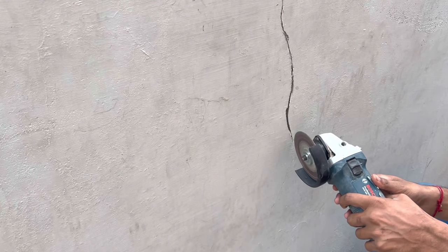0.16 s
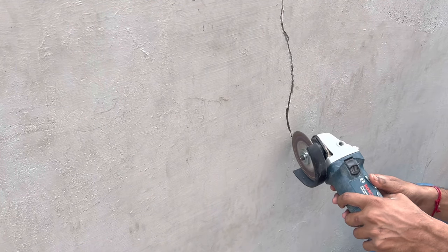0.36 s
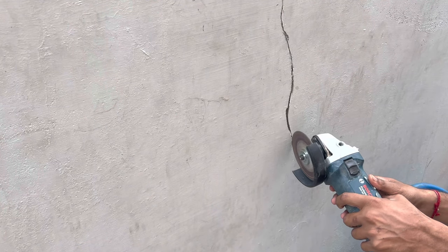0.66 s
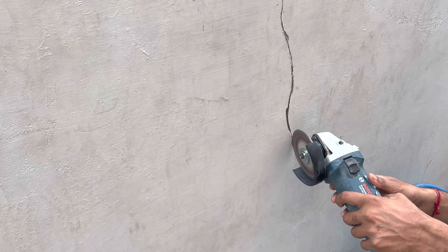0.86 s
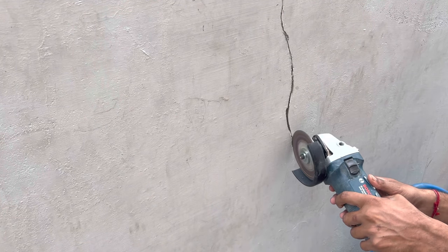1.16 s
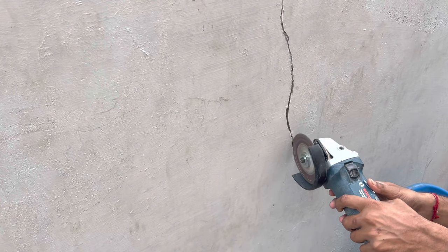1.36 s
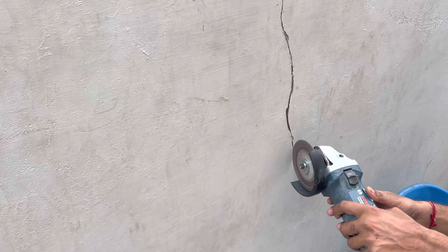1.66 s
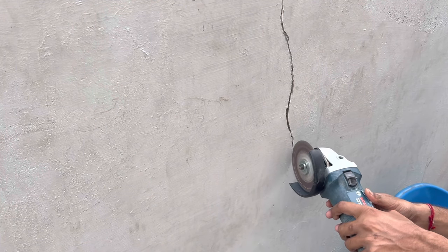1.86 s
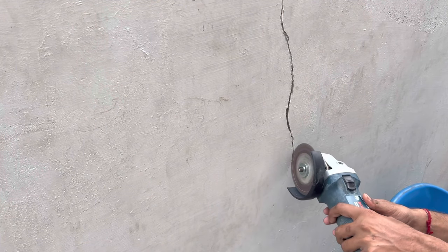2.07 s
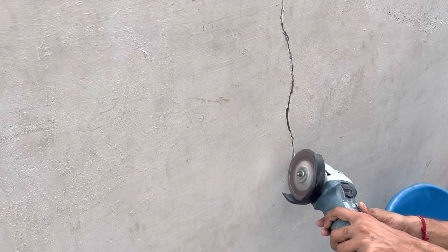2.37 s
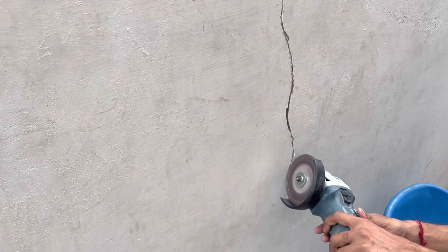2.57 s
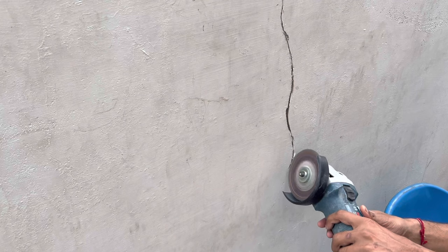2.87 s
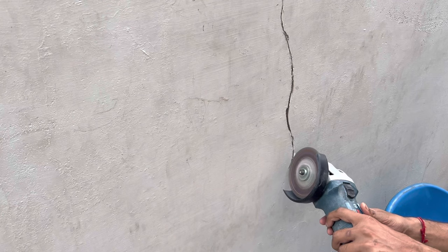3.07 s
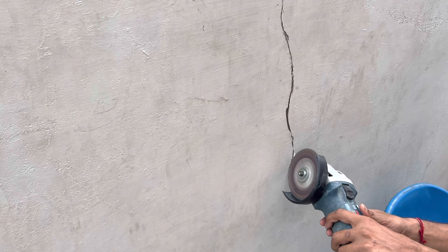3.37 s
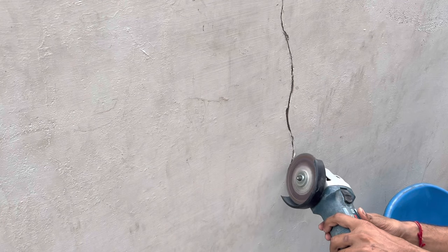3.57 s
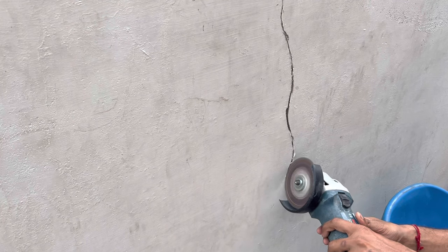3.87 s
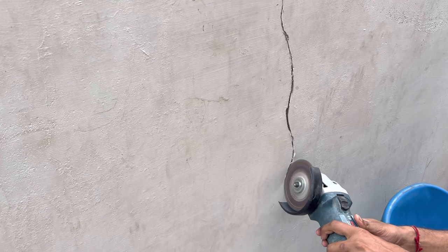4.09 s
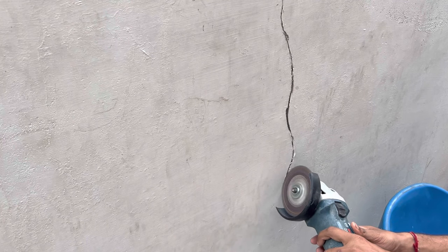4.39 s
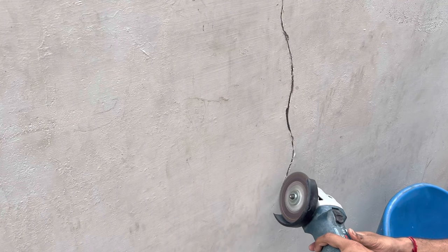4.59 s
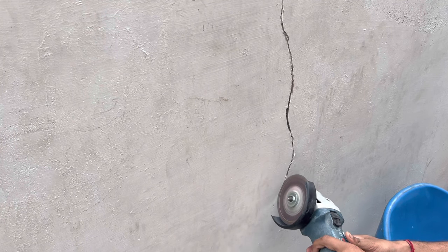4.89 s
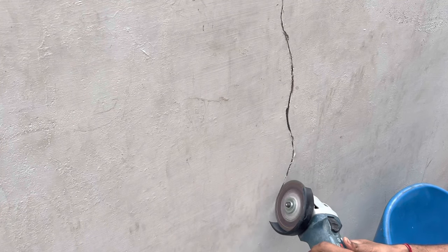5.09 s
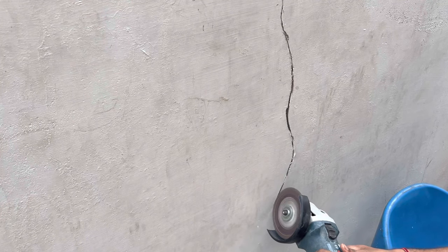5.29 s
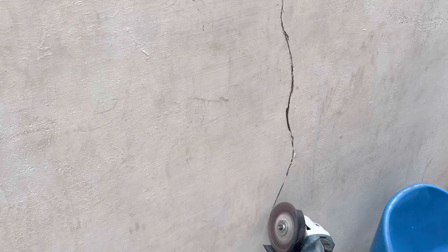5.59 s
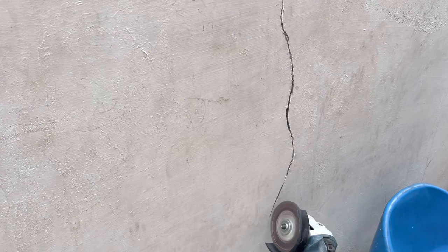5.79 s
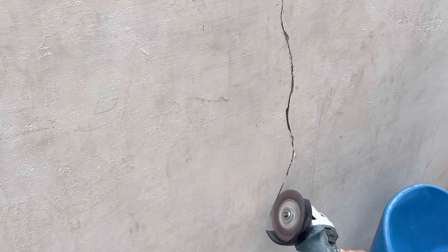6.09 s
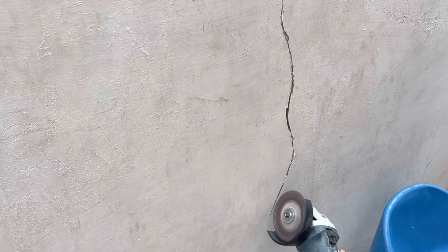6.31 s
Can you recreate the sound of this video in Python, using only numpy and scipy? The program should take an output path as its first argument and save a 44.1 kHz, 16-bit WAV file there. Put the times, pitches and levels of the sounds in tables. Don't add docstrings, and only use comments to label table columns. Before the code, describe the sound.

Electric grinder motor whirring with airy fan hiss, while a metal disc scrapes gritty masonry in bright, squealing bursts, with faint low knocks behind.

```python
import sys
import numpy as np
from scipy import signal
from scipy.fft import rfft, irfft, dct, next_fast_len
from scipy.io import wavfile
from scipy.ndimage import uniform_filter1d, map_coordinates

SR = 44100
rng = np.random.default_rng(int(sys.argv[2]) if len(sys.argv) > 2 else 0)


def undo_db(level):
    steps = np.asarray(level, float) / 20
    return 10 ** steps


def store_pcm(level_fs):
    pcm = np.round(np.clip(level_fs, -1, 1) * 32767).astype(np.int16)
    wavfile.write(sys.argv[1], SR, np.atleast_2d(pcm).T)


N = 284435
T = np.arange(N) / SR
SIZE = next_fast_len(N + 8192)
HZ = np.fft.rfftfreq(SIZE, 1 / SR)
GEAR = 9 / 32


def unit(x):
    return x / np.sqrt(np.mean(np.abs(x) ** 2) + 1e-20)


def curves(rows):
    s, *cols = np.transpose(rows)
    return [np.interp(T, s, c) for c in cols]


def wobble(rate_hz):
    knots = rng.standard_normal(int(N * rate_hz / SR) + 4)
    return map_coordinates(knots, [T * rate_hz])


def coloured(x, points):
    f, db = np.transpose(points)
    gain = undo_db(np.interp(np.log(HZ + 1), np.log(f), db))
    return irfft(rfft(x, SIZE) * gain, SIZE)[:N]


def fan_air():
    # frequency in Hz, level in dB per Hz.
    fan_spectrum = [(25, -46), (42, -24), (60, -13.5), (95, -24), (260, -20), (400, -13.5), (600, -11.5),
                    (1200, -5.5), (2500, 0), (4200, 1), (7500, -0.5), (9300, -6), (11900, 0.5),
                    (14000, -5.5), (15200, -14.5)]
    # frequency in Hz, width in Hz, level in dB.
    housing = [(829, 11, 3), (1253, 100, -4.5), (2240, 100, 0), (2616, 200, -6), (7030, 51, 2),
               (8000, 140, 7.5)]
    z = signal.stft(rng.standard_normal(N + 512), nperseg=512)[2]
    field = rng.standard_normal(z.shape)
    field = uniform_filter1d(uniform_filter1d(field, 6, 0), 12, 1)
    patchy = signal.istft(z * undo_db(1.2 * unit(field)), nperseg=512)[1][:N]
    air = coloured(patchy, fan_spectrum)
    peaks = 1 + sum(undo_db(db) / (1 + (2 * (HZ - hz) / width) ** 2) / 2 for hz, width, db in housing)
    return unit(irfft(rfft(air, SIZE) * peaks, SIZE)[:N])


def motor(turns, load):
    # cycles per disc turn, level in dB.
    disc_orders = [(2, -15.5), (3, -16), (4, -30), (5, -12.5), (8, -5.5), (24, 7)]
    # cycles per rotor turn, level in dB.
    rotor_orders = [(10, -64), (12, -64.5), (14, -64)]
    recede_db_per_s = -0.18
    strain_db = 0.9 * uniform_filter1d(load, size=8001)
    whine_db = -69 + 1.73 * recede_db_per_s * T + strain_db + (1.4 + 0.12 * T) * wobble(8.3)
    fan_db = -55 + recede_db_per_s * T + strain_db + 0.44 * wobble(7)

    def tone(cycles, db, blur_rad):
        level = undo_db(db + 0.7 * wobble(9.6) + 1.5 * wobble(0.8))
        return level * np.sin(2 * np.pi * cycles + blur_rad * wobble(40))

    blades = sum(tone(k * turns, db, 0.089 * k) for k, db in rotor_orders)
    tones = np.sin(2 * np.pi * turns + 0.21 * wobble(40))
    tones += sum(tone(k * GEAR * turns, db, 0.011 * k) for k, db in disc_orders)
    tones += (0.29 + load) * tone(GEAR * turns, -19.5, 0.1)
    return np.sqrt(2) * undo_db(whine_db) * tones + blades + undo_db(fan_db + 9.0) * fan_air()


def contact():
    # time in s, rim pressure in dB, lean in dB that feeds the middle modes.
    hands = [(0, -54.5, 2.5), (.44, -54, 0.5), (.5, -41, -1), (.72, -46.5, 3), (1.06, -38, 5.5),
             (1.3, -44, 2), (1.56, -44.5, -0.5), (1.9, -37.5, 3.5), (2.24, -40, -2), (2.31, -49, -3),
             (2.65, -56, 2.5), (3.3, -55, 1.5), (3.46, -43, 0.5), (4.0, -37.5, 0.5), (4.4, -44, -2),
             (4.8, -40, -2.5), (5.49, -43.5, -5), (5.55, -54, -4)]
    # time in s, half length in s, level in dB, extra squeal in dB.
    bites = [(0.054, 0.034, 1, 10), (0.377, 0.052, 6.5, 10.5), (0.613, 0.047, 3.5, 0), (0.677, .03, -4, -8),
             (0.801, 0.017, 2.5, 14.5), (1.195, 0.024, 0, -1), (1.274, .04, 2, -10), (1.6, 0.14, 1, -6),
             (1.746, .05, 2, -8), (1.936, 0.021, 1.5, 5), (2.035, .03, -0.5, 3), (2.146, 0.024, 0.5, 5),
             (2.207, 0.017, -1.5, 4), (2.241, 0.016, 3.5, -5), (2.726, 0.017, 4.5, 0),
             (3.233, 0.038, 6, 10), (3.349, .014, 7.5, 10), (3.633, 0.052, 1.5, 9), (3.832, 0.096, 0, 10),
             (4.0, 0.043, -0.5, 8.5), (4.08, .03, -3, 1), (4.345, 0.078, 0.5, -6), (4.778, .04, 0, 7),
             (4.84, 0.044, -2, -12), (5.14, .04, 2, 3), (5.33, .06, -4, 5), (5.428, 0.025, -0.5, 9.5),
             (5.6, 0.017, 9, 0), (6.195, .06, 4.5, -5), (6.32, 0.032, 11.5, 12.5)]
    # level in dB at firm pressure, growth in dB per dB of pressure, share of the lean.
    families = [
        (-41, 0.8, -0.23),
        (-41, 0.83, 0.77),
        (-43, 1.22, -0.19),
        (-49, 1.2, -0.026),
    ]
    firm_db = -42
    pressure_db, lean_db = curves(hands)
    shapes = [np.exp(-((T - s) / half_s) ** 2) for s, half_s, _, _ in bites]
    bite_db, extra_db = np.transpose(bites)[2:] @ shapes
    press_db = pressure_db + bite_db - firm_db
    drives = [db + grows * press_db + share * lean_db + 0.69 * wobble(19) for db, grows, share in families]
    drives[-1] = drives[-1] + extra_db
    return drives


def ring(force, modes, own_db, drift, favoured_hz=None, favour_db=0):
    # time in s, half length in s, mode in Hz, level in dB.
    flares = [(.5, 0.037, 3830, 6), (.8, 0.34, 8475, 4.5), (.9, .2, 10600, -2), (1.15, 0.24, 7300, 2),
              (1.61, .18, 5930, 8), (1.7, 0.4, 8475, 4.5), (1.585, 0.12, 4930, 6), (2.2, .1, 4625, 2.5),
              (2.35, .08, 4930, 6), (3.63, 0.043, 6418, 9), (3.795, 0.25, 4625, -4), (3.81, .03, 6418, 8),
              (3.854, 0.089, 7300, -5), (3.99, 0.035, 5930, 3), (4.05, .4, 8475, -4), (4.263, .07, 7300, 7),
              (4.36, .1, 5930, 7.5), (4.62, .07, 3850, 2.5), (4.801, 0.26, 5930, 3), (4.85, .2, 4625, 0.5),
              (5.465, 0.059, 10600, 9), (5.65, .15, 4680, 4), (6.194, 0.038, 4930, 4.5),
              (6.31, .04, 4700, -3), (6.322, 0.035, 3870, 6), (6.321, 0.026, 11310, 9.5)]
    out = np.zeros(N)
    for hz, width_hz, db in modes:
        pole = np.exp(-np.pi * width_hz / SR)
        luck_db = own_db * np.clip(wobble(13), -2, 2)
        if favour_db:
            luck_db += favour_db * np.exp(-(np.log(hz / favoured_hz) / 0.075) ** 2)
        for s, half_s, flare_hz, flare_db in flares:
            off_pitch = (np.log(hz / flare_hz) / 0.018) ** 4
            off_time = np.abs((T - s) / half_s) ** 3
            luck_db += flare_db * np.exp(-off_pitch - off_time)
        noise = rng.standard_normal(N) + 1j * rng.standard_normal(N)
        shake = force * undo_db(luck_db) * noise
        swing = np.sqrt(1 - pole ** 2) * signal.lfilter([1], [1, -pole], shake)
        cycles = np.cumsum(hz * (1 + drift * wobble(5))) / SR
        out += undo_db(db) * np.real(swing * np.exp(2j * np.pi * cycles))
    return out / np.sqrt(sum(undo_db(db) ** 2 for _, _, db in modes))


def disc(turns, drives):
    # frequency in Hz, width in Hz, level in dB.
    low_modes = [(3540, 75, -5), (3800, 27, -4), (3883, 18, -3), (4643, 40, -4.5), (4616, 23, -7),
                 (4860, 23, -7.5), (4950, 21, -1), (5063, 23, -7), (5370, 22, -10)]
    middle_modes = [(5930, 28, -3), (6350, 20, -8), (6418, 20, -4), (7235, 35, -4), (7305, 30, 0),
                    (7362, 25, -3), (8475, 30, -5), (9155, 50, -19)]
    high_modes = [(10445, 45, -1), (10560, 40, -4), (10775, 45, 0), (11305, 50, -1), (11545, 35, -4),
                  (12500, 250, -5), (13905, 40, -3), (14230, 70, -3), (14850, 90, -9)]
    squeal_modes = [(12872, 14, 0), (12925, 40, -6)]
    # frequency in Hz, level in dB per Hz.
    grit_spectrum = [(1500, -43), (3000, -24), (4400, -4), (7000, -5), (8800, -9.5), (9700, -17.5),
                     (10500, -4.5), (12800, 1), (14500, -5.5), (15300, -4.5)]
    # time in s, level in dB, fade in s.
    snags = [
        (.8, 3, .03),
        (1.185, 4, .008),
        (3.338, 8, .004),
        (4.757, 4, .004),
        (5.6, 3, .02),
        (6.286, 11, .003),
    ]
    low_db, middle_db, high_db, squeal_db = drives
    low_hz, middle_hz = 4520 + 110 * wobble(6), 7100 + 100 * wobble(5)
    throb = 1 + 0.4 * np.cos(2 * np.pi * GEAR * turns)
    uneven_db = np.clip(0.89 * wobble(40) + 1.2 * wobble(90), -4, 3.5)
    rough = unit(undo_db(uneven_db) * throb)
    for s, db, fade_s in snags:
        age = np.maximum(T - s, 0) / fade_s
        rough = rough * undo_db(db * np.e * age * np.exp(-age))
    touch = 1 / (1 + undo_db(2.7 * (-52.0 - middle_db)))
    gear_shake = undo_db(-53.0 + 1.7 * wobble(2.83))
    low_force = np.hypot(undo_db(low_db - 5.0) * rough, gear_shake)
    middle_force = undo_db(middle_db - 5.5) * touch * rough
    plate = ring(low_force, low_modes, own_db=1.26, drift=0.002, favoured_hz=low_hz, favour_db=3.5)
    plate += ring(middle_force, middle_modes, own_db=1.67, drift=0.0015, favoured_hz=middle_hz, favour_db=1.5)
    plate += ring(undo_db(high_db - 4.0) * rough, high_modes, own_db=3.0, drift=0.001)
    plate += ring(undo_db(squeal_db + 0.5) * rough, squeal_modes, own_db=-0.8, drift=0.00099)
    grains = rng.standard_normal(N) * undo_db(2.6 * rng.standard_normal(N))
    hiss = unit(coloured(grains, grit_spectrum)) * rough ** 0.7
    plate = coloured(plate, [(20, -62), (1500, -30), (3000, -0.5)])
    return plate + undo_db(0.65 * high_db + 0.37 * middle_db - 1.5) * hiss


def bumps():
    # time in s, level in dB, frequency in Hz, length in s.
    thumps = [
        (1.25, -82, 60, .4),
        (3.17, -75, 62, .3),
        (3.73, -74, 185, .12),
        (5.13, -75, 190, .16),
        (5.15, -77, 270, .12),
        (5.87, -81, 170, .12),
    ]
    out = np.zeros(N)
    for s, db, hz, length_s in thumps:
        swell = np.exp(-(3 * (T - s) / length_s) ** 2)
        cycles = np.cumsum(hz * (1 + 0.165 * wobble(30))) / SR
        out += undo_db(db) * swell * np.sin(2 * np.pi * cycles)
    return out


def scene():
    # time in s, speed in Hz.
    speed = [(0.0, 585.2), (0.64, 579.2), (1.13, 562.5), (1.92, 552.3), (2.26, 548.5), (2.59, 562.1),
             (3.02, 570.6), (3.5, 573.3), (4.27, 550.4), (5.35, 546.4), (6.0, 569.5), (6.45, 574.4)]
    turns = np.cumsum(uniform_filter1d(curves(speed)[0], size=4001)) / SR
    drives = contact()
    load = np.clip(undo_db(drives[2] + 51.5), 0, 1.5)
    mono = motor(turns, load) + disc(turns, drives) + bumps()
    return np.array([mono, mono])


def masked(x, jitter_db):
    # frequency in Hz, level in dB.
    coarse = [(2000, -28), (4000, -13), (6500, -6), (8500, -1), (9400, 1), (9800, 3.5), (10150, 3),
              (10300, -.5), (12500, -.5), (14000, .5), (14800, 2), (15300, 9)]
    m, h = 1024, 512
    window = np.sin(np.pi * (np.arange(2 * m) + 0.5) / (2 * m))
    padded = np.pad(x, (m, 2 * m))
    frames = np.lib.stride_tricks.sliding_window_view(padded, 2 * m)[::m] * window
    a, b, c, d = np.split(frames, 4, axis=1)
    lines = dct(np.hstack([-c[:, ::-1] - d, a - b[:, ::-1]]), type=4, norm="ortho")
    power = uniform_filter1d(uniform_filter1d(lines ** 2, size=221, axis=1), size=3, axis=0)
    mask = np.sqrt(power + 1e-16)
    luck = np.repeat(rng.standard_normal((len(lines), 64)), 16, axis=1)
    line_hz = (np.arange(m) + 0.5) * SR / 2 / m
    step_db = np.interp(line_hz, *np.transpose(coarse)) + jitter_db * np.clip(luck, -1.5, 2.5)
    step = mask * undo_db(step_db)
    lines = np.sign(lines) * np.floor(np.abs(lines) / step + 0.4) * step
    y = dct(lines, type=4, norm="ortho")
    p, q = y[:, :h], y[:, h:]
    back = np.hstack([q, -q[:, ::-1], -p[:, ::-1], -p]) * window
    return (back[1:, :m] + back[:-1, m:]).ravel()[:N]


def band_limit(x):
    return signal.sosfilt(signal.butter(12, 15700, fs=SR, output="sos"), x)


def record(dry):
    colour = [(20, -7.0), (9000, 0), (9500, 0.5), (9900, -6.0), (10180, -7.5), (10350, -1.0),
              (14800, 1.0), (15200, -4), (15650, -5), (15750, -90)]
    mono = masked(coloured(dry[0], colour), jitter_db=2.5)
    return band_limit(np.array([mono, mono]))


dry = scene()
out = record(dry)
store_pcm(out)
```